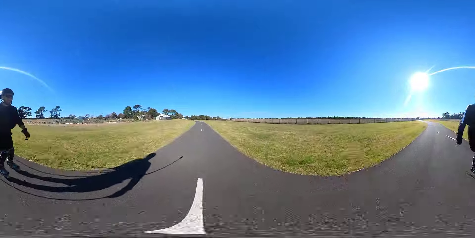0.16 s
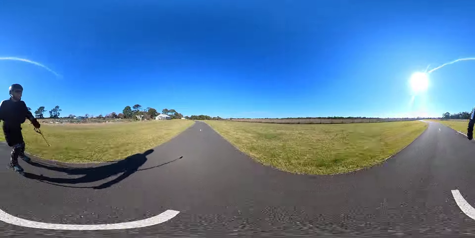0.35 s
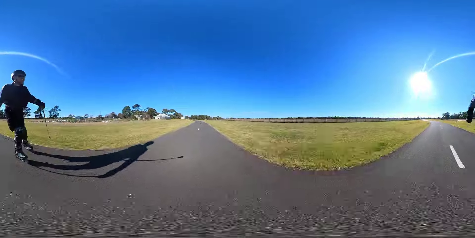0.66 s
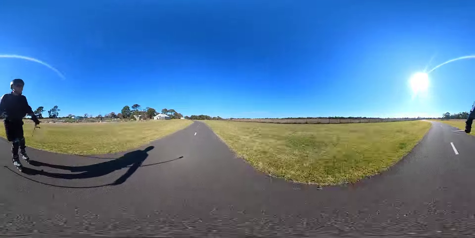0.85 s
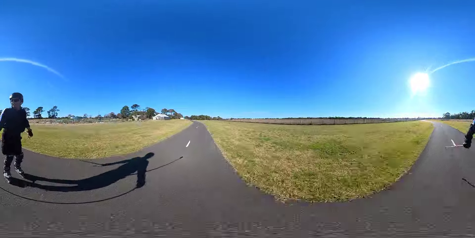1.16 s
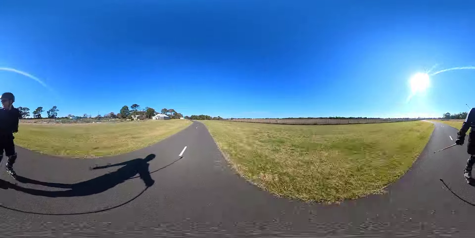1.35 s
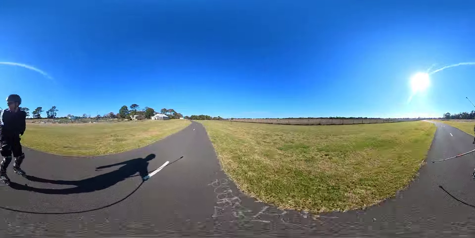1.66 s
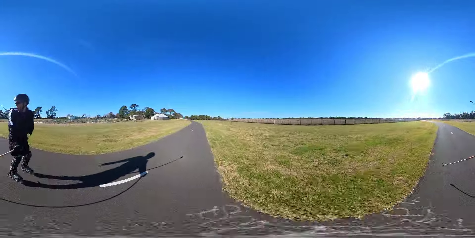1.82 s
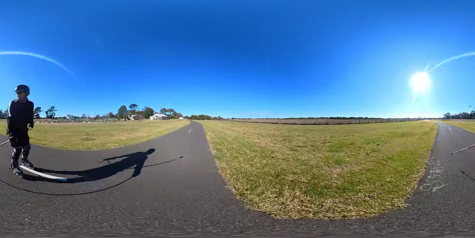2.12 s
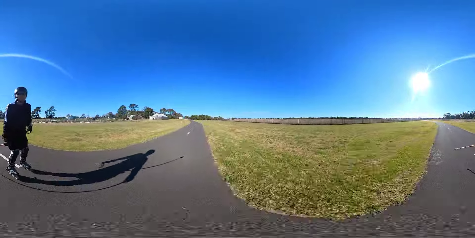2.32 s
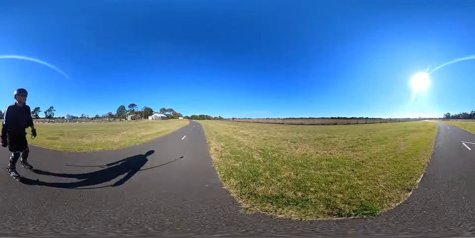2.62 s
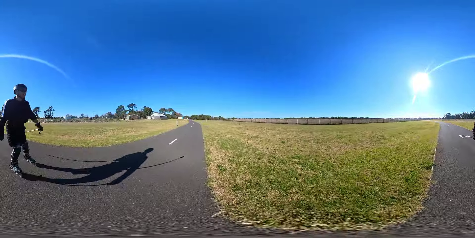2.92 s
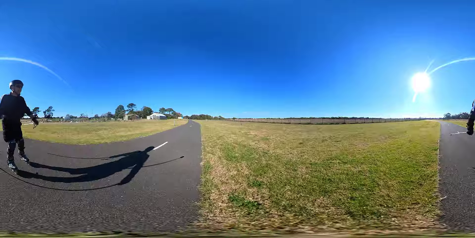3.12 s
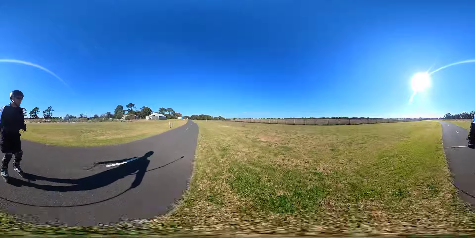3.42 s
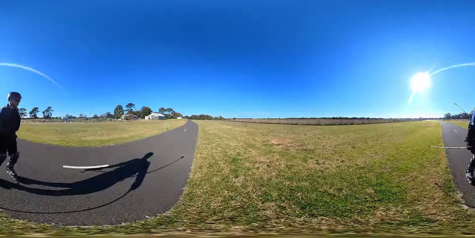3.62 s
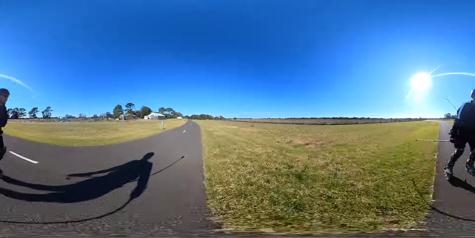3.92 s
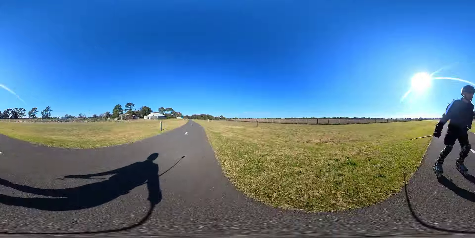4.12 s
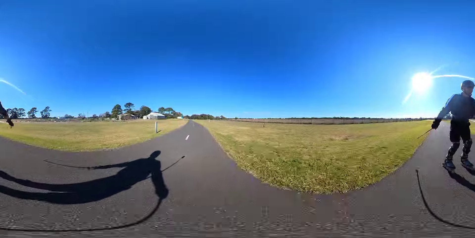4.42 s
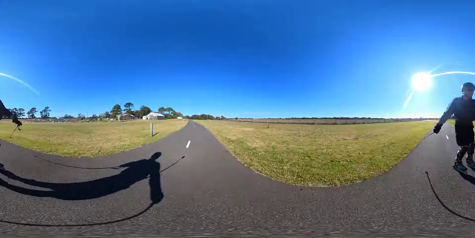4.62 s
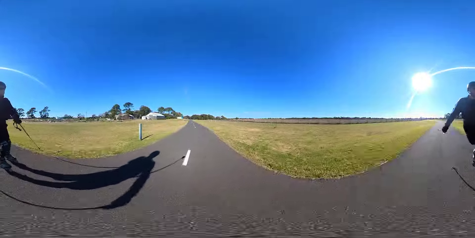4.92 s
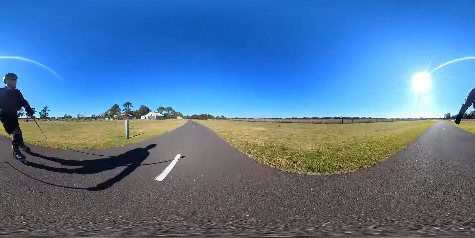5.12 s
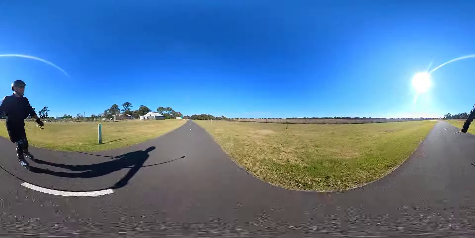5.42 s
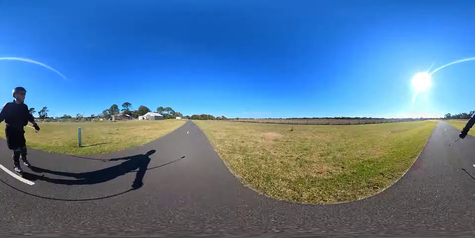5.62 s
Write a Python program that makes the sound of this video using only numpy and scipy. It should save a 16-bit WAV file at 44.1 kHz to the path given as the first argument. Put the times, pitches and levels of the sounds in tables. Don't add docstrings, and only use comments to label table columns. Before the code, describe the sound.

Inline skate wheels drum and rattle over coarse asphalt, with clattering knocks, while wind roars, flutters and thumps on the microphone.

```python
import sys
import numpy as np
from scipy import signal
from scipy.fft import rfft, irfft
from scipy.io import wavfile
from scipy.ndimage import uniform_filter1d

SR = 44100
rng = np.random.default_rng(int(sys.argv[2]) if len(sys.argv) > 2 else 0)


def ratio(d):
    e = np.asarray(d, float) / 20
    return 10 ** e


def put_to_file(sound):
    columns = np.atleast_2d(sound).T
    safe = np.clip(columns, -1, 1)
    whole_steps = np.round(safe * 32767)
    wavfile.write(sys.argv[1], SR, whole_steps.astype(np.int16))


N = 254016
STEP = 32


def shaped(x, spectrum):
    hz, db = np.transpose(spectrum)
    f = np.maximum(np.fft.rfftfreq(N, 1 / SR), 1)
    gain_db = np.interp(np.log(f), np.log(hz), db, left=-90, right=-90)
    y = irfft(rfft(x) * ratio(gain_db), N)
    return y / y.std()


def split(x, hz):
    share = 1 / (1 + (np.fft.rfftfreq(N, 1 / SR) / hz) ** 6)
    parts = irfft(rfft(x) * np.sqrt([share, 1 - share]), N)
    return parts / parts.std(axis=1, keepdims=True)


def walk(rate_hz):
    hold = int(SR / rate_hz)
    levels = np.repeat(rng.standard_normal(N // hold + 1), hold)
    slewed = uniform_filter1d(uniform_filter1d(levels, hold), hold)[:N]
    return slewed / slewed.std()


def curves(table):
    s, *columns = np.transpose(table)
    return [np.interp(np.arange(N) / SR, s, column) for column in columns]


def stretches(table):
    t = np.arange(0, N, STEP) / SR
    lift_db = sum(db * np.exp(-(2 * (t - s) / length) ** 4 / 2) for s, db, length in table)
    return np.repeat(lift_db, STEP)[:N]


def ring(x, modes):
    out = 0
    for k, (hz, width_hz, db) in enumerate(modes):
        b, a = signal.iirpeak(hz, hz / width_hz, SR)
        out = out + (-1) ** k * ratio(db) * signal.lfilter(b, a, x)
    return out


# time_s, weight_on_wheels_db, frame_looseness_db, lean_onto_edge_db
RIDE = [(0.0, -27.5, -40, -7.5), (0.06, -27.5, -38, 3), (0.16, -32, -41, -0.5), (0.48, -31.5, -39.5, -1),
        (0.62, -29, -39.5, 1), (0.66, -33, -45.5, -2), (0.85, -29.5, -42, 3.5), (1.57, -32.5, -42.5, -4.5),
        (1.83, -29, -38, 1.5), (2.36, -35.5, -42.5, 3.5), (3.26, -39.5, -43.5, 2.5), (3.29, -38.5, -48, 2),
        (3.75, -35.5, -43, -3), (4.4, -36, -46, -9), (4.85, -30, -38.5, 5), (5.12, -31, -41, -4),
        (5.42, -27.5, -40, 4), (5.76, -29, -40, -1.5)]
# middle_s, rattle_lift_db, length_s
ROUGH_PATCHES = [(0.047, 3, 0.013), (0.17, 4, 0.04), (0.278, 3.5, 0.024), (0.381, 4, .04),
                 (0.437, 4, 0.018), (0.496, 4.5, 0.023), (.57, 0.5, .03), (0.711, 5.5, 0.0073),
                 (.91, 5, 0.038), (0.976, 3, 0.014), (1.175, 1, 0.022), (1.219, 5, 0.03),
                 (1.364, 2.5, 0.089), (1.706, 1.5, 0.034), (1.965, 4.5, 0.033), (2.111, 1.5, 0.055),
                 (2.50, 8, 0.029), (2.736, 5, 0.086), (3.142, 4, 0.023), (3.218, 6, 0.012),
                 (3.371, 9.5, 0.011), (4.163, 2, 0.03), (4.204, 3, 0.019), (4.491, 3.5, 0.024),
                 (4.821, 0, 0.025), (5.262, 4, 0.044), (5.479, 0, 0.029)]
# middle_s, drumming_lift_db, length_s
WEIGHT_ROCKS = [(.92, 2.5, 0.14), (1.77, 2.5, 0.055), (2.13, 1, 0.061), (2.57, 3, 0.05), (2.75, 2.5, 0.12),
                (3.39, 3.5, 0.083), (3.55, 3, 0.07), (3.94, 0, 0.037), (4.18, 0.5, .1), (4.66, 3, .08),
                (4.77, 0, 0.11)]


def skates():
    load_db, loose_db, lean_db = curves(RIDE)
    rough_db = stretches(ROUGH_PATCHES)
    loose_db = loose_db + rough_db - 1
    low_db = loose_db - 3 - lean_db / 2 + 0.23 * (load_db + 38)
    high_db = loose_db - 5 + lean_db / 2
    judder_db = 1.9 * walk(70) + 0.34 * walk(27)
    drum_db = load_db + 3 + 0.27 * rough_db + stretches(WEIGHT_ROCKS)
    drumming = wheels(drum_db, judder_db)
    rattle = grit(low_db, high_db, judder_db)
    return drumming + rattle + knocks(small_blows(low_db, high_db) + clear_blows())


def stones(rate_hz, spread_db, fade_ms):
    hit = rng.random(N) < rate_hz / SR
    jolt = hit * ratio(spread_db * np.minimum(rng.exponential(size=N), 2.5))
    fade = np.exp(-1000 / (fade_ms * SR))
    return rng.standard_normal(N) * (1 + signal.lfilter([1], [1, -fade], jolt))


# pitch_hz, density_db
WHEEL_SPECTRUM = [(120, -17.5), (200, -3.5), (236, -3), (387, -2), (465, -4), (604, -7.5), (925, -11.5),
                  (1600, -26.5), (2080, -37.5), (3520, -120)]


def wheels(level_db, judder_db):
    return shaped(stones(300, 0.31, 0.83), WHEEL_SPECTRUM) * ratio(level_db + 0.18 * judder_db)


# pitch_hz, density_db
GRIT_SPECTRUM = [(710, -36.5), (1200, -32), (1470, -6), (2900, -4.5), (4210, -7.5), (4830, -1.5),
                 (5820, -4.5), (7310, -10), (8310, -17.5), (9120, -28), (11900, -64), (20100, -120)]


def grit(low_db, high_db, judder_db):
    low, high = split(shaped(stones(220, 1.5, 1.0), GRIT_SPECTRUM), 3750)
    low = low * ratio(low_db - 2 + 0.5 * walk(30))
    high = high * ratio(high_db + 0.5 * walk(30))
    return (low + high) * ratio(0.79 * judder_db)


def small_blows(low_db, high_db):
    luck = np.clip(rng.standard_normal((600, 3)), -1.6, 1.6)
    s = np.cumsum(np.exp(0.27 * luck[:, 0])) / 68
    keep = s < N / SR
    s, luck = s[keep], luck[keep]
    i = (s * SR).astype(int)
    size_db = 3.5 + 1.2 * luck[:, 1]
    colour_db = 3 * luck[:, 2]
    body_db = low_db[i] + size_db + colour_db
    ring_db = high_db[i] + size_db - colour_db
    return list(np.transpose([s, body_db, body_db, ring_db]))


# start_s, peak_db,
# hub_db, body_db, spacer_db
CLEAR_KNOCKS = [(0.0447, -21, -11.5, -10.5, -15), (0.1717, -24.5, -19, -12, -16.5),
                (0.2673, -24, -22, -9, -14), (0.3522, -22, -21.5, -13, -9.5),
                (0.374, -20, -20.5, -18, -10), (0.441, -21.5, -14, -16, -17),
                (0.475, -27, -14, -16, -10.5), (0.4877, -19, -17.5, -17, -16),
                (0.5009, -15.5, -19, -15.5, -16), (0.5536, -25, -17.5, -11, -11),
                (0.565, -25, -14.5, -13, -13), (0.664, -31.5, -17, -7.5, -10),
                (0.704, -27.5, -16, -11, -16), (0.7342, -24, -17, -12.5, -14),
                (0.7522, -19.5, -22, -13, -12), (0.84, -28, -14, -7.5, -9), (0.8939, -21, -16, -13, -13),
                (0.9731, -28, -13, -11, -15), (1.0111, -31, -11, -8, -16), (1.035, -33, -19, -13.5, -15),
                (1.0997, -23, -22, -12, -18), (1.155, -25, -13, -10.5, -14), (1.189, -26, -10, -11, -11),
                (1.2174, -25.5, -13, -9, -8), (1.2526, -33, -16, -12, -15.5), (1.295, -24, -19, -9, -16),
                (1.34, -26, -21, -15, -9), (1.3524, -22.5, -19.5, -13, -10), (1.4545, -24.5, -18, -7, -9),
                (1.49, -24.5, -17.5, -11, -18), (1.5354, -40, -12.5, -15, -17),
                (1.5858, -30, -7, -9, -11.5), (1.6345, -22.5, -12, -12.5, -10.5),
                (1.6807, -29.5, -15, -8, -8.5), (1.69, -21, -13.5, -10, -15), (1.7299, -23, -18, -10, -11),
                (1.7754, -25.5, -13, -14, -6.5), (1.826, -24, -12, -10, -8),
                (1.8396, -19.5, -8, -10, -10.5),
                (1.868, -20, -24, -20, -6), (1.932, -31, -15.5, -13, -12), (1.95, -23, -14, -11.5, -11),
                (2.0673, -29, -18, -21, -16), (2.0845, -23, -14, -10, -3.5), (2.1123, -15, -18, -17, -9.5),
                (2.176, -20.5, -16, -13.5, -11), (2.204, -31, -13, -10, -9), (2.2354, -23, -22, -10.5, -7),
                (2.283, -26, -16, -16.5, -11.5), (2.3293, -23.5, -18.5, -9, -9),
                (2.372, -25, -25, -13.5, -10), (2.39, -35, -13.5, -18, -13), (2.422, -33, -18, -13.5, -7),
                (2.4528, -27.5, -21, -10.5, -7), (2.4927, -27, -13, -12, -11),
                (2.5623, -21, -27, -15, -12.5), (2.581, -24.5, -20, -12, -10), (2.641, -26, -18, -11, -12),
                (2.709, -35, -15, -14, -5), (2.7281, -26.5, -24.5, -18, -6), (2.7636, -26, -19, -11.5, -8),
                (2.8155, -30.5, -17, -10, -12.5), (2.8392, -29, -14, -11, -9.5),
                (2.8726, -27, -11, -12, -5), (2.9085, -24.5, -9.5, -11.5, -7),
                (2.923, -18.5, -16.5, -14.5, -12), (2.9721, -22.5, -14, -17, -11),
                (3.021, -30, -24, -11, -14), (3.04, -24, -23, -15, -15), (3.1305, -27.5, -21, -10.5, -10),
                (3.2114, -28, -24, -11, -15), (3.254, -28, -17, -13, -13.5), (3.307, -29, -11, -12.5, -19),
                (3.3478, -32, -13, -13.5, -7.5), (3.373, -33, -15.5, -12, -14), (3.463, -33, -17, -16, -8),
                (3.5162, -32.5, -15, -13, -5), (3.5453, -28.5, -16, -13.5, -10),
                (3.6093, -29.5, -10, -18, -8.5),
                (3.692, -30, -17, -9.5, -14), (3.718, -33.5, -20, -9, -16), (3.7344, -34, -12.5, -8, -12.5),
               (3.7576, -29, -14, -8, -17.5), (3.802, -30, -16, -15, -13.5), (3.8202, -27, -11, -11, -13),
               (3.895, -22.5, -12.5, -13, -15.5), (3.928, -23, -15, -11.5, -15),
               (3.949, -23.5, -18, -15, -9.5), (4.0323, -22.5, -9, -15, -14.5),
               (4.096, -30, -7.5, -10.5, -13), (4.1078, -23, -15.5, -17, -18), (4.137, -27, -12, -15, -11),
               (4.1608, -26, -8, -17, -11), (4.1907, -22.5, -9, -17, -11.5), (4.2433, -20.5, -11, -20, -18),
               (4.2633, -30.5, -14, -14, -8), (4.2931, -27, -11, -17, -15), (4.309, -28, -8, -17, -17.5),
               (4.3287, -27.5, -7, -14, -16.5), (4.393, -31, -12, -15, -16.5),
               (4.4333, -27, -5.5, -17, -16), (4.448, -29, -6, -18, -15.5), (4.4844, -26.5, -8, -16.5, -13),
               (4.4934, -24, -7, -24, -16), (4.5361, -30, -6.5, -12.5, -19),
               (4.5593, -26.5, -9, -20.5, -23), (4.6358, -21.5, -15, -11, -17),
               (4.6826, -22, -21, -12, -11.5), (4.741, -28, -16, -7, -16),
                (4.807, -18, -24, -12, -12), (4.826, -25, -18, -14.5, -11), (4.8407, -25.5, -22, -18.5, -9),
               (4.883, -29.5, -16.5, -10, -6.5), (4.9018, -21, -14, -13, -9),
               (4.9174, -19.5, -20, -10, -12), (4.9504, -27, -16.5, -10, -8), (4.9678, -22, -24, -13, -9),
               (4.982, -27, -20, -18, -13.5), (4.999, -25, -21, -17.5, -11), (5.036, -34, -11, -10, -11),
               (5.062, -21, -18.5, -15.5, -13.5), (5.0926, -21, -12, -15, -13),
               (5.1272, -27.5, -9, -17, -9.5), (5.1681, -28, -7, -16, -15.5),
               (5.2046, -28, -16.5, -10, -15), (5.246, -23, -8, -8.5, -20), (5.2743, -24, -12, -12, -16),
               (5.337, -30, -10.5, -14, -13), (5.3787, -19, -12, -12, -9.5),
               (5.4105, -22.5, -16, -13, -5.5), (5.469, -26, -14.5, -10.5, -9.5),
               (5.5296, -27, -8.5, -8, -14.5), (5.5912, -23.5, -21, -9, -14),
               (5.6361, -24.5, -17, -15, -12), (5.686, -24.5, -14, -9.5, -12), (5.737, -27, -17, -9, -13),
                (0.2812, -25, -20, -8, -14.5), (0.2944, -26, -18, -12, -8), (0.31, -28, -21, -16, -7),
                 (0.3642, -21, -25, -15.5, -9), (0.3944, -28, -16, -11, -11),
                 (0.4077, -23, -14, -12.5, -12), (0.421, -22, -16.5, -13.5, -12),
                 (0.512, -22, -15, -15, -13), (0.7667, -24.5, -11, -13, -15),
                 (1.8089, -27.5, -14, -12.5, -4), (1.9696, -21.5, -14, -14, -5),
                 (1.9872, -25.5, -8, -11, -10), (2.0144, -25, -15, -13, -8), (2.034, -29, -18, -15, -15),
                 (2.05, -27.5, -15.5, -12, -8), (2.097, -20, -12, -17, -20), (2.1257, -23, -14, -12, -13),
                 (2.1433, -26.5, -10, -6, -5), (5.485, -22.5, -15, -14, -9), (4.577, -30.5, -6, -14.5, -17)]


def clear_blows():
    hits = CLEAR_KNOCKS
    return [(s, db + hub + 6, db + body + 5.5, db + spacer + 2) for s, db, hub, body, spacer in hits]


# pitch_hz, width_hz, level_db
HUB_MODES = [(800, 510, -3), (1730, 590, 2)]
# pitch_hz, width_hz, level_db
BODY_MODES = [(2474, 510, 5.5), (2980, 700, 5.5), (3760, 1230, 2)]
# pitch_hz, width_hz, level_db
SPACER_MODES = [(5500, 1300, -17), (5620, 670, 8), (6630, 1100, 0), (8000, 1700, -12.5)]


def knocks(hits):
    span = 1500
    struck = np.zeros((3, N + span))
    chance = rng.standard_normal((len(hits), span))
    t = np.arange(span) / SR
    blow = (1 - np.exp(-t / 0.0003)) * np.exp(-t / 0.0014)
    after = ratio(np.array([[-13], [-19.5], [-19.5]])) * np.exp(-t / 0.014)
    for (s, *db), rough in zip(hits, chance):
        chatter = rough * (blow + after) / np.sqrt(np.sum((rough * blow) ** 2))
        start = int(s * SR)
        struck[:, start:start + span] += ratio(np.array(db) + 23.5)[:, None] * chatter
    parts = (HUB_MODES, BODY_MODES, SPACER_MODES)
    return sum(ring(x, modes) for x, modes in zip(struck, parts))[:N]


# time_s, level_db
BREEZE_LEVEL = [(0.0, -34), (0.64, -25), (0.66, -34), (0.96, -26), (2.31, -30), (2.36, -34.5),
                (2.62, -25.5), (2.84, -35.5), (2.87, -25.5), (3.19, -24), (3.22, -30.5), (3.38, -24.5),
                (3.88, -35.5), (4.51, -34), (4.78, -27.5), (5.25, -36.5), (5.73, -23), (5.76, -34)]
# top_s, level_db, length_s
ROAR_PUFFS = [(0.19, -23, 0.13), (0.474, -10.5, 0.083), (0.633, -15, 0.094), (.77, -13.5, 0.13),
              (1.07, -16, 0.12), (1.24, -12, 0.028), (1.313, -16, 0.027), (1.453, -18.5, 0.14),
              (1.668, -18.5, 0.23), (1.85, -18.5, 0.18), (2.066, -12.5, 0.082), (2.32, -22, 0.07),
              (2.612, -19, 0.15), (2.884, -15.5, 0.026), (3.008, -17, 0.045), (3.17, -37, 0.033),
              (3.27, -16.5, 0.049), (3.44, -18.5, 0.031), (3.537, -19.5, 0.046), (3.644, -14.5, 0.026),
              (3.975, -16.5, 0.017), (4.1, -28, 0.12), (4.835, -28, 0.06), (5.295, -19, 0.059),
              (5.595, -12.5, 0.12)]


def gusts():
    t = np.arange(0, N, STEP) / SR
    breeze_db, = curves(BREEZE_LEVEL)
    calm = ratio(-31.5 + 0.74 * (breeze_db + 29.5)) ** 2
    puffs = np.zeros(len(t))
    for s, db, length_s in ROAR_PUFFS:
        side_s = length_s * np.where(t < s, 0.61, 1)
        puffs += ratio(db) ** 2 * np.exp(-2 * np.abs(t - s) / side_s)
    puffs = np.interp(np.arange(N) / SR, t, puffs)
    lift_db = 10 * np.log10(1 + puffs / calm)
    roar_db = 10 * np.log10(calm) + lift_db
    flutter_db = breeze_db + 0.7 + 0.089 * lift_db
    return roar_db, flutter_db


# pitch_hz, density_db
WIND_SPECTRUM = [(8.8, -36.5), (15, -10), (48, 1.5), (71, 1), (209, -8), (237, -14), (306, -23.5),
                 (450, -30.5), (580, -50.5), (990, -120)]


def wind():
    roar_db, flutter_db = gusts()
    slow = shaped(rng.standard_normal(N) * ratio(1.9 * walk(22.3)), WIND_SPECTRUM)
    quick = shaped(rng.standard_normal(N) * ratio(0.98 * walk(40)), WIND_SPECTRUM)
    return split(slow, 118)[0] * ratio(roar_db) + split(quick, 124.5)[1] * ratio(flutter_db)


# middle_s, peak_db, length_ms
EDDY_THUMPS = [(0.327, -12.5, 3.4), (0.365, -11, 3.1), (0.457, -10, 2), (0.535, -13, 3.9),
               (0.618, -7, 1.54), (0.779, -8.5, 1.45), (0.977, -8.5, 2.2), (1.051, -7, 2.9),
               (1.102, -5, 3.6), (1.242, -4.5, 2.5), (1.308, -12, 2.1), (1.327, -6, 5.5),
               (1.543, -10.5, 2.15), (1.822, -9, 4.6), (1.884, -14, 2.7), (2.192, -8.5, 3.8),
               (2.299, -10, 3.2), (2.692, -11, 4.7), (3.0037, -10, 1.9), (3.071, -9.5, 2.4),
               (3.14, -14, 2.4), (5.643, -11.5, 4.8), (5.725, -10, 3.2),
               (0.604, -16.5, 1.7), (0.612, -8, 1.8), (0.769, -11.5, 1.4), (1.115, -11, 2.9),
              (3.261, -20.5, 1.6), (3.448, -9.5, 4.8), (4.795, -21.5, 0.74), (0.472, -9.5, 4.5),
              (.742, -15, 3.1), (5.7147, -11, 3.7), (2.012, -11.5, 4.6), (2.056, -12, 3.6), (2.143, -8, 11),
              (3.428, -11, 2.2), (3.982, -18, 3.1)]
# middle_s, peak_db, length_ms
EDDY_PULLS = [
    (0.491, -13.5, 6),
    (.531, -13.5, 2.6),
    (1.4796, -10, 3.6),
    (1.707, -5.5, 6.7),
    (2.8709, -10, 2.9),
    (2.958, -12.5, 2.2),
    (3.1638, -10.5, 1.5),
    (3.4046, -9, 1.27),
    (5.512, -9, 7),
    (5.6204, -8.5, 2.5),
]


def thumps():
    t = np.arange(N) / SR
    out = np.zeros(N)
    pushes = [(eddy, 1) for eddy in EDDY_THUMPS]
    pulls = [(eddy, -1) for eddy in EDDY_PULLS]
    for (s, db, ms), way in pushes + pulls:
        near = slice(max(int((s - 0.02) * SR), 0), int((s + 0.02) * SR))
        out[near] += way * ratio(db + 7) * np.exp(-((t[near] - s) / (0.00054 * ms)) ** 2)
    return signal.sosfilt(signal.butter(1, 75, "highpass", fs=SR, output="sos"), out)


# start_s, peak_db, pitch_hz
STONE_TICKS = [(.7664, -31, 7540), (.917, -31, 7300), (1.1895, -27, 7500), (1.635, -32, 7400),
               (1.6805, -33, 7500), (1.9505, -31, 7400), (2.334, -22, 5200), (2.507, -31, 7600),
               (2.5545, -22, 5200), (2.5635, -32, 7500), (2.9728, -28.5, 7450), (4.494, -33.5, 7500),
               (5.093, -31, 7400), (5.2745, -32, 7360), (5.3905, -28, 6000), (5.428, -26, 7200),
               (5.433, -29, 6800), (5.4698, -26, 7200), (5.497, -20.5, 4480), (5.543, -31, 3000),
               (5.596, -19, 4000)]


def ticks():
    span = 400
    out = np.zeros(N + span)
    fade = np.exp(-np.arange(span) / SR / 0.0012)
    for s, db, hz in STONE_TICKS:
        band = [hz * 0.85, hz * 1.15]
        sos = signal.butter(2, band, "bandpass", fs=SR, output="sos")
        y = signal.sosfilt(sos, rng.standard_normal(span) * fade)
        start = int(s * SR)
        out[start:start + span] += ratio(db - 4) * y / np.abs(y).max()
    return out[:N]


# pitch_hz, width_hz, level_db
WHEEL_HUM_MODE = [(385, 130, -11.5)]


def boom():
    middle_s, length_s = 4.76, 0.22
    t = np.arange(N) / SR
    return ring(rng.standard_normal(N), WHEEL_HUM_MODE) * np.exp(-(2 * (t - middle_s) / length_s) ** 2)


def scene():
    mono = skates() + wind() + thumps() + ticks() + boom()
    return np.array([mono, mono])


def roll_off(x):
    return signal.sosfilt(signal.butter(12, 9600, fs=SR, output="sos"), x)


def record(dry):
    soft = np.tanh(1.126 * dry) / 1.519
    dull = signal.sosfilt(signal.butter(6, 8200, fs=SR, output="sos"), soft)
    dull = signal.sosfilt(signal.butter(16, 9400, fs=SR, output="sos"), dull)
    mix = dull * np.minimum(np.arange(N)[::-1] / 60, 1)
    return roll_off(mix)


dry = scene()
out = record(dry)
put_to_file(out)
```